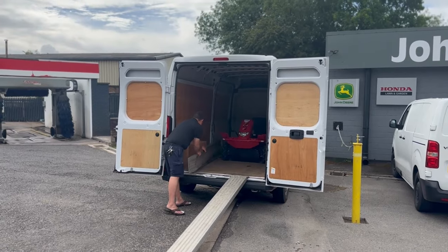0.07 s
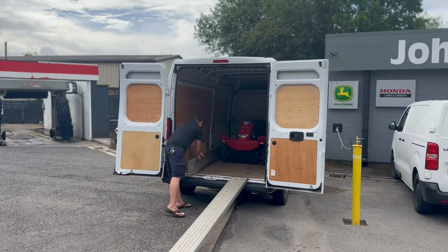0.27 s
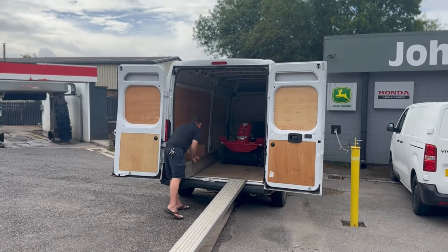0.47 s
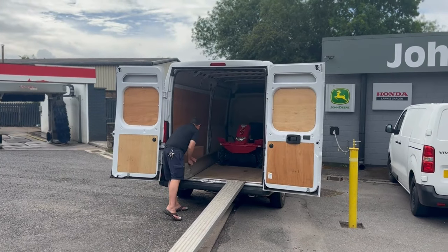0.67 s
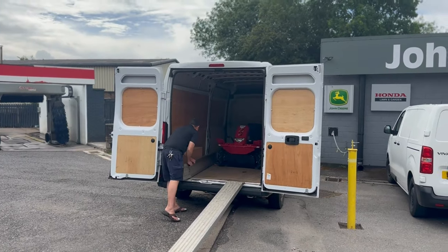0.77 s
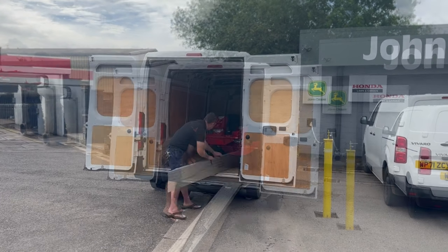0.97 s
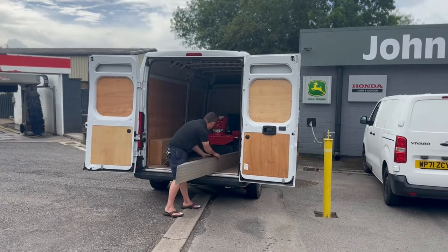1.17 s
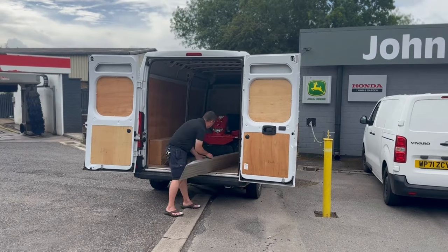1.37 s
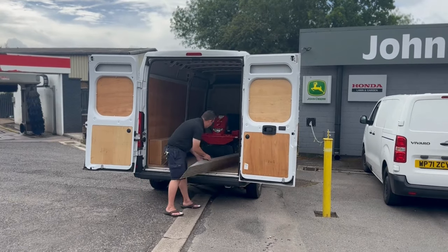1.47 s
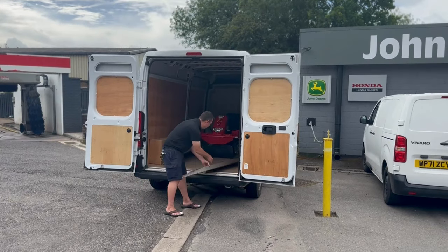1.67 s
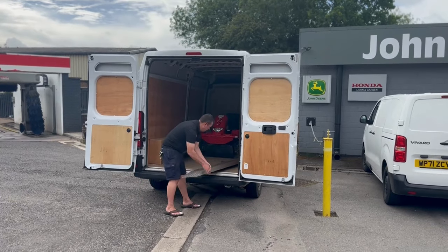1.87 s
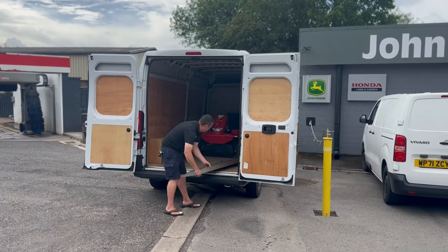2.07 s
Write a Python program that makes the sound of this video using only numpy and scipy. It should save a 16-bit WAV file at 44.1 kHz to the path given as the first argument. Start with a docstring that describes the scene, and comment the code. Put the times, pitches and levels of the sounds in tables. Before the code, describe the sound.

Metal ramps are loaded into a van outdoors. The first lands with a loud, ringing clatter and a low rumble; the second scrapes, clanks and slides in, then settles with several hollow bangs over a faint hush of air.

```python
"""Two aluminium loading ramps go into a van, outdoors. The first drops on the plywood floor and clatters
to rest: each impact excites its modes, its edge and the floor, and the van's panels boom on. The second
knocks as it is gripped, scrapes on the sill and bangs down. Stick-slip friction makes it judder as it
slides in; it tips flat and stops with a thin squeak. The loudest bangs overload the microphone."""
import sys
import numpy as np
from scipy import signal
from scipy.fft import rfft, irfft
from scipy.io import wavfile

SR = 44100
rng = np.random.default_rng(int(sys.argv[2]) if len(sys.argv) > 2 else 0)


def master(y):
    """Save y as 16-bit WAV."""
    cut = np.clip(np.atleast_2d(y).T, -1, 1)
    pcm = np.round(cut * 32767)  # scale
    wavfile.write(sys.argv[1], SR, pcm.astype(np.int16))


N = 92610
T = np.arange(N) / SR
FREQS = np.fft.rfftfreq(N, 1 / SR)

# Impacts of each ramp: start_s, ring_db, highpass_hz, lowpass_hz, clank_db, thud_db, thud_hz
FIRST_IMPACTS = [(.221, -26.5, 400, 2220, -40.5, -60, 111), (.231, -12, 200, 1075, -35, -10.5, 145),
                 (.238, -2.5, 60, 1190, -14, -4.5, 113.8), (.262, -4.5, 220, 1070, -18, -10, 68.6),
                 (.300, -6, 280, 1300, -19, -11.5, 178), (.335, -5.5, 250, 910, -11.5, -21, 125),
                 (.385, -7, 280, 1050, -40, -19, 151), (.431, -6.5, 200, 1500, -14.5, -12.5, 126),
                 (.455, -12.5, 100, 590, -42, -9.5, 86.6), (.520, -10, 300, 380, -50, -44, 99.5),
                 (.556, -13, 300, 364, -55.5, -19.5, 94.4), (.674, -23.5, 1200, 2000, -45, -30, 66)]
SECOND_IMPACTS = [(1.067, -7, 470, 2060, -20.5, -26, 67.4), (1.082, -11.5, 97, 1560, -15, -13.5, 116.7),
                  (1.100, -14, 50, 1230, -18.5, -14, 62.2), (1.152, -11, 305, 1700, -22, -35, 110),
                  (1.177, -12, 250, 1930, -16.5, -21, 120), (1.222, -13, 312, 1090, -22, -24, 203),
                  (1.251, -23, 246, 1800, -25, -25, 104), (1.295, -39, 254, 1200, -46, -27.5, 110),
                  (1.343, -24.5, 251.6, 796, -35, -28, 113), (1.428, -19.5, 250, 880, -36, -32.5, 70),
                  (1.466, -23.5, 400, 2570, -26.5, -58, 110), (1.488, -0.5, 229, 337, -51.5, -11.5, 211),
                  (1.530, -15.5, 249, 450, -50, -41.5, 203), (1.606, -9.5, 250, 1330, -27.5, -21, 159.5),
                  (1.637, -1.5, 260, 514, -35.5, -15.5, 182.3), (1.675, -14.5, 300, 493, -58, -32, 176),
                  (1.713, -1.5, 397, 440, -43, -39, 103.5), (1.748, -6.5, 392, 433, -65, -29.5, 110),
                  (1.790, -17.5, 279, 450, -64, -34.5, 203), (1.850, -31, 290, 330, -79, -47.5, 90)]
# Modes of each ramp, of a struck edge and of the gripping knock: pitch_hz, relative_db, t60_s
FIRST_MODES = [(317.5, 0, 0.38), (335.6, -4, 0.71), (384, -5.5, 0.42), (446.5, -9, .35), (496.3, -1.5, 0.6),
               (592, -0.5, 0.28), (658, -17, 0.8), (734, 2, 0.34), (781, -3.5, 0.62), (817.5, 0.5, 1),
               (892.6, -5, 0.75), (984, -10, .55), (1007, -14.5, 0.85), (1174, -13.5, 0.56)]
SECOND_MODES = [(198.7, -4, 0.51), (299.8, 1, 0.48), (365.6, -12, 0.64), (387.5, -3, .32),
                (418, -0.5, 0.33), (436.3, 1.5, 0.32), (483, 0.5, 0.35), (560, -12.5, .36),
                (578, -5.5, 0.42), (654, -1.5, 0.35), (710.3, -5, 0.34), (769, -6, 0.22),
                (1217, -2.5, 0.28), (1363, -1.5, 0.37)]
EDGE_MODES = [(3000, -9.5, .06), (4420, -1.5, 0.082), (4740, -2.5, .06)]
GRIP_MODES = [(309.5, -4, 0.37), (364, -2, 0.28), (380, -0.5, 0.27)]
# Decay of the diffuse ring of each ramp and the van: frequency_hz, t60_s
FIRST_DECAY = [(80, 1), (220, 0.72), (400, 0.58), (900, .47), (2000, 0.42), (6000, 0.43), (14000, .33)]
SECOND_DECAY = [(80, 0.43), (400, 0.37), (900, 0.26), (2000, 0.42), (6000, .2), (14000, .16)]
# Partials of the plywood floor: pitch_ratio, level_db
FLOOR_PARTIALS = [(.62, -9), (1.002, 8), (1.271, 0.5), (1.698, 0)]
# Spectral densities of the noise-like sources: frequency_hz, relative_db
DIFFUSE_SPECTRUM = [(30, -21.5), (100, -2.5), (240, -5), (320, 1), (600, -0.5), (830, 1.5), (1150, -6),
                    (2200, -14), (4000, -24), (8000, -23), (15000, -25)]
CLANK_SPECTRUM = [(300, -19), (1200, -15), (2800, 4.5), (3800, 1.5), (4600, -0.5), (5600, -7), (7200, -7),
                  (9500, -16), (11500, -23.5), (15500, -25)]
SCRAPE_SPECTRUM = [(100, -60), (350, -20.5), (700, -6), (1200, 0.5), (2000, -4.5), (3100, 1), (4200, -6.5),
                   (5300, -11.5), (7000, -13.5), (9300, -22), (11500, -32.5), (15500, -33.5)]
SLIDE_SPECTRUM = [(80, -29), (400, 1), (750, 12.5), (1200, 2), (2300, 0.5), (4000, -3), (5200, -11.5),
                  (7000, -8), (8000, -19.5), (9200, -18), (11500, -30.5), (15500, -32)]
BOOM_SPECTRUM = [(30, -13), (50, -8.5), (64, -3.5), (90, -13), (130, -17), (250, -48.5), (1000, -80.5)]
AIR_SPECTRUM = [(20, -11), (42, 2.5), (70, -12), (200, -24.5), (700, -23), (1200, -27.5), (2300, -39),
                (6000, -46), (15000, -52)]
RUSTLE_SPECTRUM = [(2600, -28), (3500, -4.5), (5000, -12.5), (7000, -3), (9200, -9.5), (11000, -21.5),
                   (15000, -28)]
# Envelopes of the sustained sources: time_s, level_db
SCRAPE_ENVELOPE = [(.76, -72), (.80, -45), (.90, -52.5), (.935, -33), (.97, -24), (1.0, -20.5),
                   (1.045, -26.5), (1.08, -21), (1.13, -63.5)]
SLIDE_ENVELOPE = [(1.12, -22.5), (1.18, -21.5), (1.26, -18.5), (1.325, -19), (1.36, -26), (1.47, -25.5),
                  (1.55, -24.5), (1.62, -24), (1.68, -29.5), (1.75, -34), (1.80, -52), (1.86, -78)]
SQUEAK_ENVELOPE = [(1.69, -68), (1.745, -54), (1.76, -46), (1.80, -51), (1.86, -78)]
BOOM_ENVELOPE = [(.44, -33), (.48, -21.5), (.62, -25), (.72, -23.5), (.76, -34), (.82, -28), (.88, -30.5),
                 (.95, -48), (1.0, -56)]
RUSTLE_ENVELOPE = [(0, -61), (.2, -66), (.6, -69), (.7, -46), (.76, -59), (.88, -47.5), (.96, -52)]


def ramp_impacts(impacts, modes, decay, diffuse_db, clank_t60_s, modes_db=-0.5):
    """Impulse excitation: each blow drives ramp, edge and floor; a softer contact rings duller."""
    out = np.zeros(N)
    for start_s, ring_db, highpass_hz, lowpass_hz, clank_db, thud_db, thud_hz in impacts:
        body = amp(modes_db) * modal_ring(modes) + amp(diffuse_db) * diffuse_ring(decay)
        body *= rise(0.003)
        body = signal.lfilter(*signal.butter(3, lowpass_hz, fs=SR), body)
        body = signal.lfilter(*signal.butter(2, highpass_hz, "high", fs=SR), body)
        add(out, start_s, amp(ring_db) * body)
        add(out, start_s, amp(clank_db) * edge_clank(clank_t60_s))
        add(out, start_s, amp(thud_db) * floor_thud(thud_hz))
    return out


def modal_ring(modes, spread_db=3):
    """Modal superposition: damped sines whose balance, drawn at random, depends on the point struck."""
    gains = amp(np.array(modes)[:, 1] + spread_db * rng.standard_normal(len(modes)))
    gains /= np.sqrt(np.sum(gains ** 2) / 2)
    return sum((-1) ** k * gains[k] * fade(t60_s) * np.sin(2 * np.pi * hz * T[:SR])
               for k, (hz, _, t60_s) in enumerate(modes))


def diffuse_ring(decay):
    """Modal overlap: weak modes and echoes in the van merge into noise, each band with its own decay."""
    hz, t, bands = signal.stft(noise(DIFFUSE_SPECTRUM, size=SR), SR, nperseg=512)
    damping = np.exp(-np.log(1000) * t / at_frequency(decay, hz)[:, None])
    return signal.istft(bands * damping, SR, nperseg=512)[1][:SR]


def edge_clank(tail_t60_s, tail_db=-9, ping_db=-7.5):
    """Hard contact: metal on metal gives a broadband burst with a weaker tail and a brief modal ping."""
    envelope = fade(t60_s=0.036) + amp(tail_db) * fade(tail_t60_s)
    burst = noise(CLANK_SPECTRUM, size=SR) * envelope
    return (burst + amp(ping_db) * modal_ring(EDGE_MODES)) * rise(0.001)


def floor_thud(pitch_hz):
    """Damped plate vibration: the plywood floor answers with low, inharmonic partials."""
    partials = sum((-1) ** k * amp(db) * np.sin(2 * np.pi * ratio * pitch_hz * T[:SR])
                   for k, (ratio, db) in enumerate(FLOOR_PARTIALS))
    return partials * fade(t60_s=0.17) * rise(0.0031)


def metal_resonances(x, ripple_db=2.6, ripple_width_hz=90, corner_hz=1500):
    """Resonant filtering: the ramps' crowded high modes put fine peaks and dips on what they radiate."""
    depth_db = ripple_db * FREQS ** 2 / (FREQS ** 2 + corner_hz ** 2)
    log_gain = np.log(amp(depth_db * smooth_random(len(FREQS), ripple_width_hz * N / SR)))
    mirrored = np.r_[log_gain, log_gain[-2:0:-1]]
    minimum_phase = np.exp(np.conj(signal.hilbert(mirrored)))  # ringing follows its cause
    return irfft(rfft(x) * minimum_phase[:len(FREQS)], N)


def friction(judder_db=2.6, judder_s=0.014, drone_db=6, drone_lowpass_hz=800):
    """Forced vibration: after a light scrape, the loaded slide judders, rasps and drives the low modes."""
    response = modal_ring(SECOND_MODES)
    force = level(SLIDE_ENVELOPE) * amp(judder_db * smooth_random(N, judder_s * SR))
    drone = signal.fftconvolve(slips() * force, response / np.linalg.norm(response))[:N]
    drone = signal.lfilter(*signal.butter(2, drone_lowpass_hz, fs=SR), drone)
    scrape = colour(slips(), SCRAPE_SPECTRUM) * level(SCRAPE_ENVELOPE)
    rasp = colour(slips(), SLIDE_SPECTRUM) * force
    return scrape + rasp + amp(drone_db) * drone


def slips(rate_per_s=5000, spread_db=0.5):
    """Stick-slip motion: friction is a dense, random train of tiny impulses of uneven size."""
    sizes = amp(-spread_db * np.minimum(rng.exponential(1, N), 4))
    signs = rng.choice([-1, 1], N)
    slipping = rng.random(N) < rate_per_s / SR
    return unit(sizes * signs * slipping)


def grip_knock(start_s=0.772, level_db=-20.5):
    """Soft excitation: the second ramp, taken up, rocks against the van and sounds hollow low modes."""
    out = np.zeros(N)
    add(out, start_s, amp(level_db) * modal_ring(GRIP_MODES) * rise(0.017))
    return out


def squeak(pitch_hz=6560, bandwidth_hz=320):
    """Narrowband resonance: slips filtered by one peak give a thin, fuzzy squeak as the ramp stops."""
    peak = 1 / (1 + (2 * (FREQS - pitch_hz) / bandwidth_hz) ** 2)
    return unit(irfft(rfft(slips()) * peak, N)) * level(SQUEAK_ENVELOPE)


def panel_boom():
    """Panel radiation: the van's body rumbles on after the first ramp lands."""
    return noise(BOOM_SPECTRUM) * level(BOOM_ENVELOPE)


def outdoor_background(air_db=-58.5):
    """Ambient noise: a steady low hush, with a faint high rustle in the first second."""
    return amp(air_db) * noise(AIR_SPECTRUM) + noise(RUSTLE_SPECTRUM) * level(RUSTLE_ENVELOPE)


def amp(db):
    """Amplitude ratio of a level in decibels."""
    return 10 ** (np.asarray(db) / 20)


def unit(x):
    """Normalisation to rms 1."""
    return x / np.sqrt(np.mean(x ** 2) + 1e-20)


def at_frequency(points, hz):
    """Interpolation on a logarithmic frequency axis."""
    knots_hz, values = np.transpose(points)
    return np.interp(np.log(hz + 1), np.log(knots_hz + 1), values)


def level(envelope):
    """Gain interpolated in decibels, zero outside the envelope's span."""
    time_s, level_db = np.transpose(envelope)
    return amp(np.interp(T, time_s, level_db)) * (T >= time_s[0]) * (T <= time_s[-1])


def colour(x, spectrum):
    """Spectral shaping, at rms 1."""
    gain = amp(at_frequency(spectrum, np.fft.rfftfreq(len(x), 1 / SR)))
    return unit(irfft(rfft(x) * gain, len(x)))


def noise(spectrum, size=N):
    """Stationary Gaussian noise with a given spectrum."""
    return colour(rng.standard_normal(size), spectrum)


def smooth_random(count, width):
    """Correlated noise of rms 1 that changes over about width steps."""
    window = signal.windows.hann(int(2 * width) + 3)
    return unit(signal.fftconvolve(rng.standard_normal(count), window, "same"))


def fade(t60_s):
    """Exponential decay, one second long."""
    return np.exp(-np.log(1000) * T[:SR] / t60_s)


def rise(time_constant_s):
    """First-order attack, one second long."""
    return 1 - np.exp(-T[:SR] / time_constant_s)


def add(mix, start_s, sound):
    """Superposition of a delayed sound on the mix."""
    part = mix[round(start_s * SR):][:len(sound)]
    part += sound[:len(part)]


def scene():
    """Linear superposition of both ramps, the van and the outdoor air."""
    first = ramp_impacts(FIRST_IMPACTS, FIRST_MODES, FIRST_DECAY, diffuse_db=1.5, clank_t60_s=0.4)
    # Hands damp the second ramp, so its clank dies sooner.
    second = ramp_impacts(SECOND_IMPACTS, SECOND_MODES, SECOND_DECAY, diffuse_db=3.5, clank_t60_s=0.28)
    background = outdoor_background()
    ramps = metal_resonances(first + second + grip_knock() + friction())
    return (ramps + panel_boom() + squeak() + background)[None]


def record(dry, clip_level=0.52, knee=9.8, bass_cut_hz=18, band_limit_hz=15750):
    """Saturation: the microphone flattens the loudest peaks; filters cut deep bass and extreme treble."""
    clipped = dry / (2.5 + abs(dry / clip_level) ** knee) ** (1 / knee)
    highpassed = signal.lfilter(*signal.butter(1, bass_cut_hz, "high", fs=SR), clipped)
    lowpass = signal.firwin(511, band_limit_hz, window=("kaiser", 9), fs=SR)
    return signal.oaconvolve(highpassed, lowpass[None], "same")


dry = scene()
out = record(dry)
master(out)
```